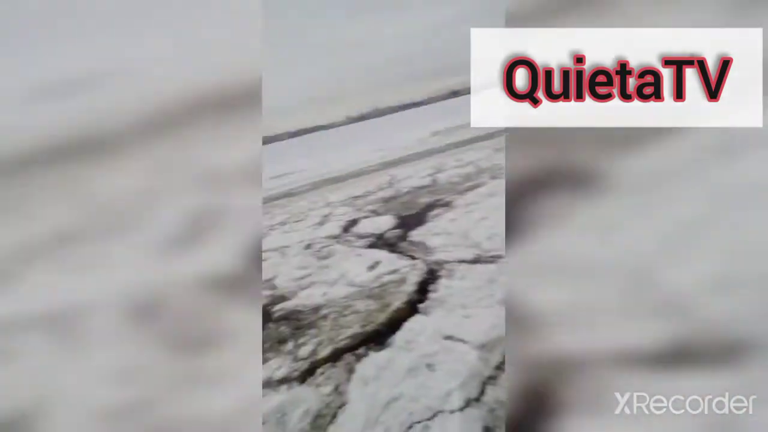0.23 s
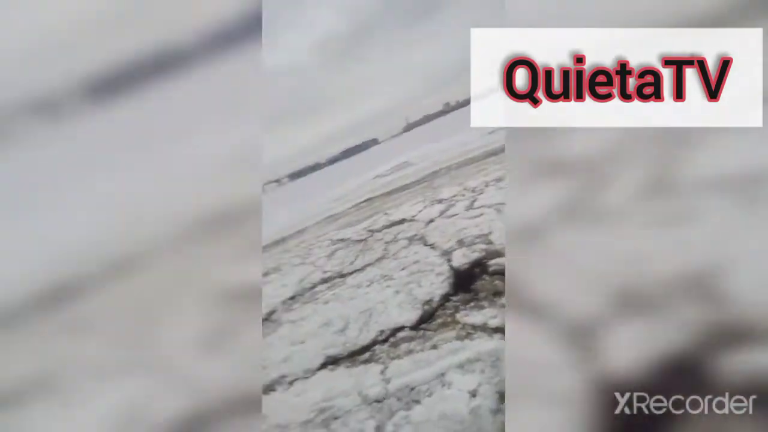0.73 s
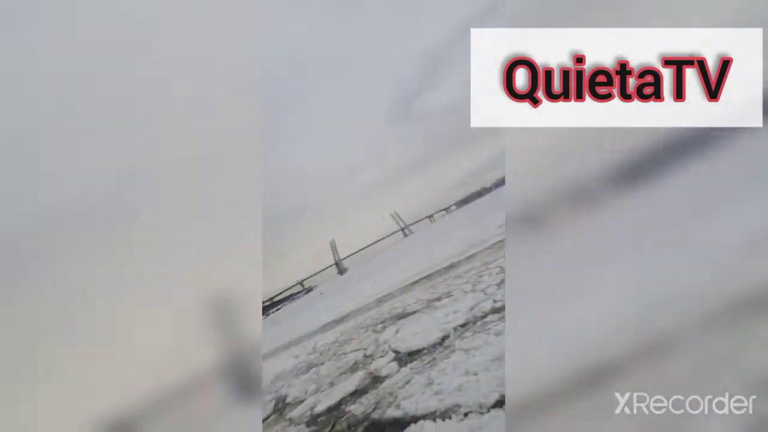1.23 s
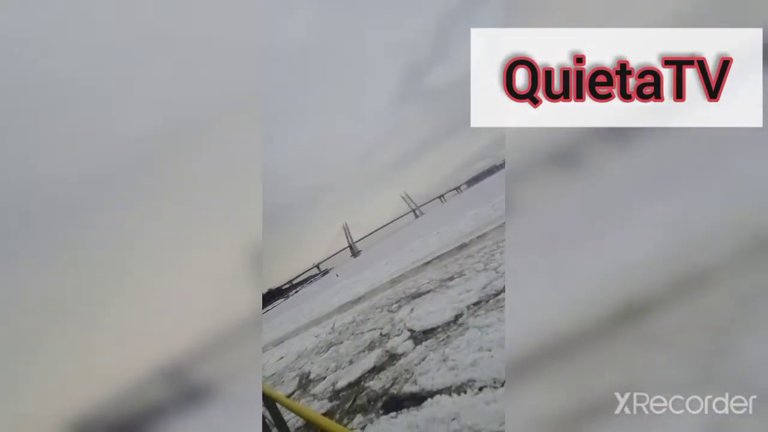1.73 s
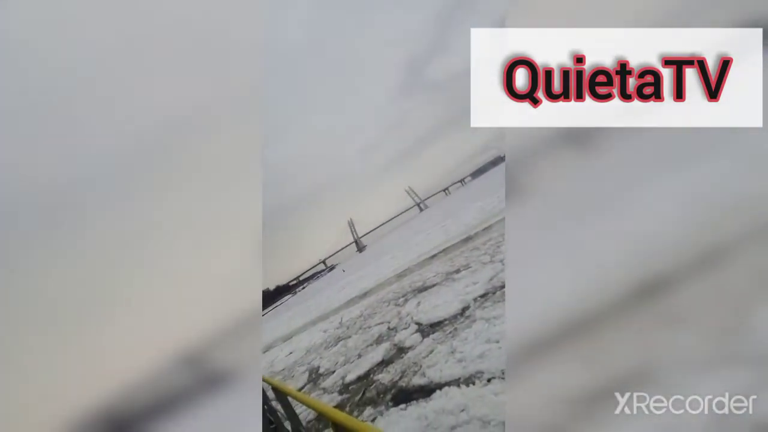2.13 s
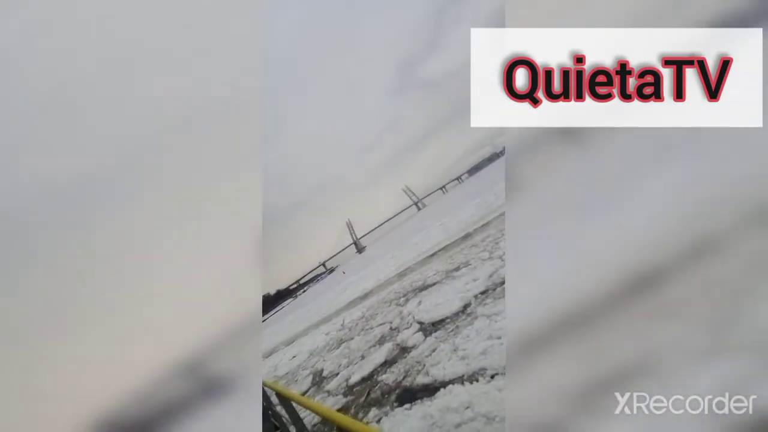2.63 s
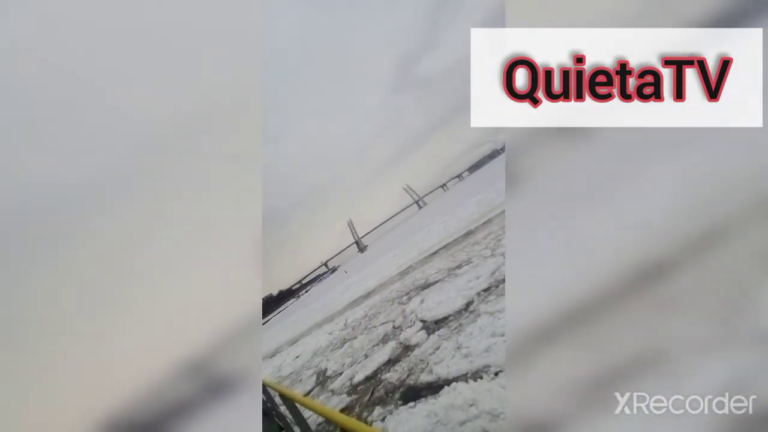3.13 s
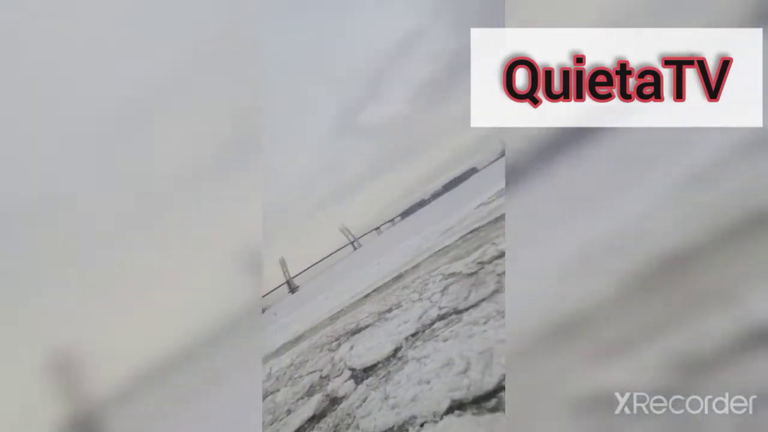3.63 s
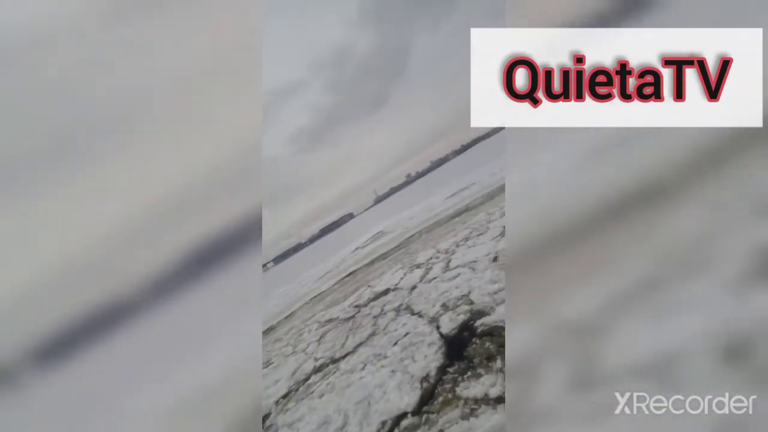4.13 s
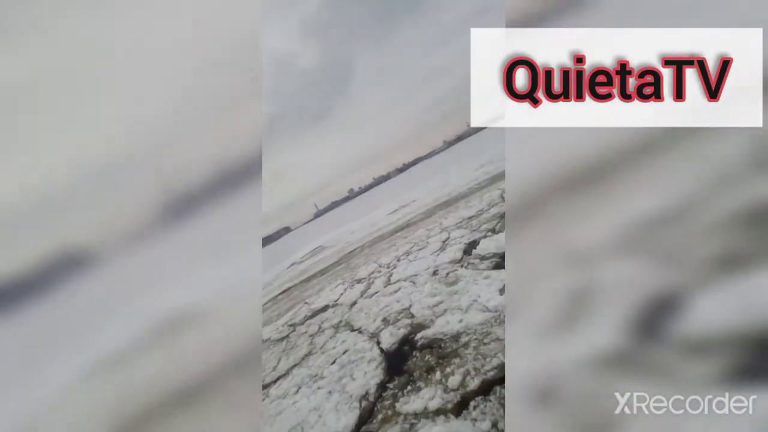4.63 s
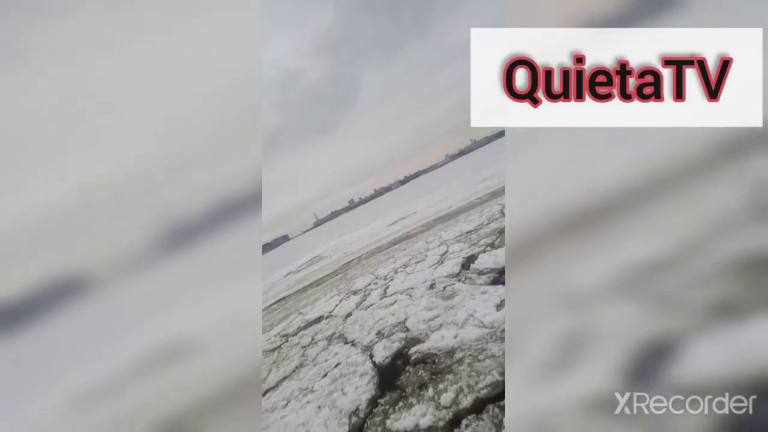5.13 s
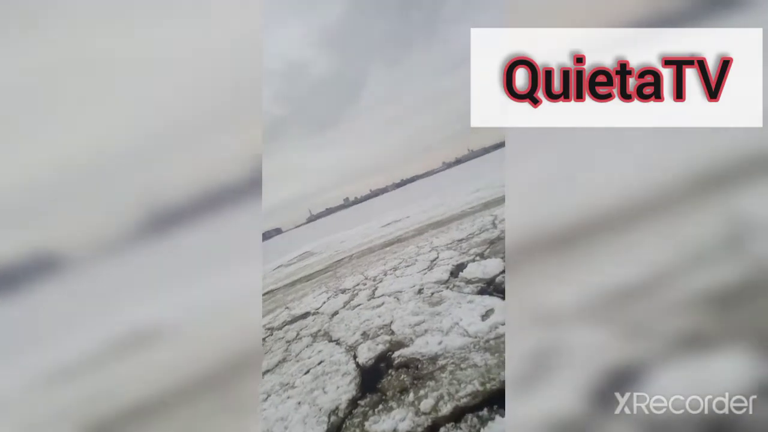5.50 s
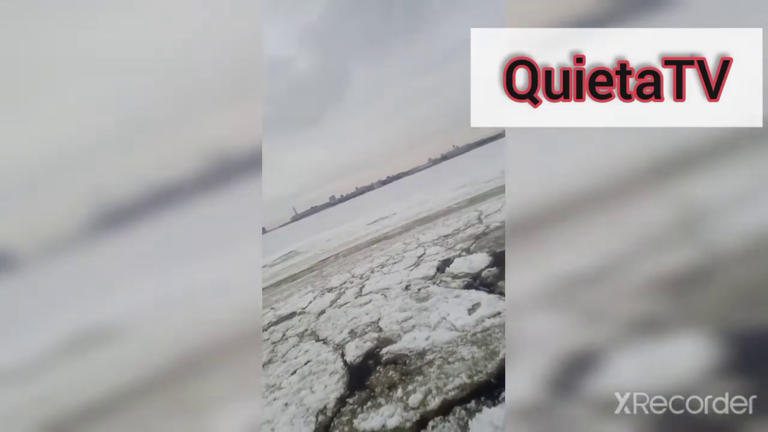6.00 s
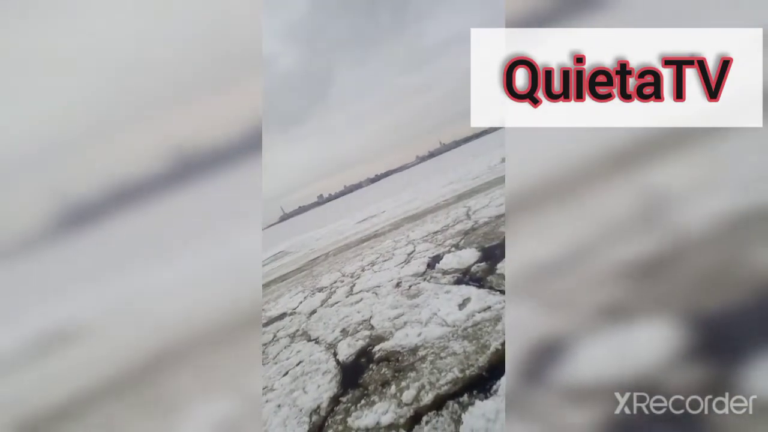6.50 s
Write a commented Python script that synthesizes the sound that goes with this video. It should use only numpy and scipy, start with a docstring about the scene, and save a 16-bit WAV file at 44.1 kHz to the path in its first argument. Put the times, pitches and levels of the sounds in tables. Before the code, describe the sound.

Deep, steady ship engine throb with rattling metal plating and fan roar, plus faint swishes of icy slush.

```python
"""A deep, rolling engine beat swells up: a ship in broken ice, heard from the open deck.
Its big twelve-cylinder diesel fires unevenly, booming in the exhaust and rattling the metal plating
the same way on every cycle, six cycles a second, over a roar of gas and fans.
Slush swishes past the hull, and a small loose metal fitting jingles faintly.
About halfway through, the listener turns and the balance of the tones shifts."""
import sys
import numpy as np
from scipy import signal
from scipy.fft import rfft, irfft
from scipy.io import wavfile
from scipy.ndimage import uniform_filter1d

SR = 44100
rng = np.random.default_rng(int(sys.argv[2]) if len(sys.argv) > 2 else 0)


def digitize_waveform(pressure):
    """Quantize a signal to 16-bit integers and store it at the path in sys.argv[1].

    Rows of a 2-D input are taken as channels; values are limited to [-1, 1].
    """
    field = np.atleast_2d(pressure).T
    bounded = np.clip(field, -1, 1)
    quanta = np.round(bounded * 32767).astype(np.int16)
    wavfile.write(sys.argv[1], SR, quanta)


N = 298116
TIME = np.arange(N) / SR
CYCLE_HZ, CYCLE_SAMPLES = 5.993, 7360  # in one engine cycle, every cylinder fires once
TURN_START_S, TURN_TAKES_S = 3.02, .89  # the listener turns away from the deck panel and the fitting

# Ringing air ducts. Each row: pitch in Hz, width in Hz, level in dB before the turn, and after it.
DUCTS = [(323.7, 23, -35.5, -36), (391.7, 5.4, -41, -40.5), (1051, 10.4, -46.5, -46.5),
         (1933, 7.5, -59.5, -60.5), (3590, 18, -69, -72.5), (3655, 18, -70.5, -74),
         (4320, 130, -72.5, -73.5), (8470, 170, -69, -77)]
# The generator's hum. Each row: pitch in Hz, level in dB.
GENERATOR_HUM = [(39.5, -55), (59.3, -43), (79, -47)]
# The fan's whine comes and goes. Each row: time in seconds, level in dB.
FAN_LEVEL = [(0, -41), (.6, -37), (1, -40), (1.2, -36), (1.52, -34.5), (2.05, -49), (2.3, -36), (2.65, -50),
             (3.05, -48), (3.6, -36.5), (4.1, -47), (5.2, -40), (5.55, -35), (5.8, -40), (6.2, -38.5),
             (6.5, -44), (6.76, -37)]
# Swishes of slush. Each row: time of the peak in seconds, level there in dB, rise in seconds,
# fade in seconds, tilt toward the treble in dB per octave, lowest and highest frequency in Hz.
SWISHES = [(.33, -62, .03, 0.15, 4, 3000, 15000), (1.39, -48.5, .038, .11, 5, 4000, 16000),
           (2.83, -57, .045, .09, 0, 4000, 14000), (5.32, -51, 0.049, 0.14, -1, 2800, 16000),
           (6.54, -50.5, 0.05, .11, -3, 5000, 16000)]
# The tones the loose fitting rings with. Each row: pitch in Hz, width in Hz, relative level in dB.
FITTING_TONES = [(7060, 210, -6.5), (7410, 220, -5.5), (7750, 280, -9), (8500, 420, -5.5),
                 (9360, 220, -15.5), (14400, 500, -22)]
# The two stops it touches. Each row: place in its swing from 0 to 1, relative level in dB.
STOPS = [(.11, 0), (.78, -2)]
# How hard it chatters against them. Each row: time in seconds, strength in dB.
CHATTER = [(0, -70), (3.4, -67.5), (4.3, -63), (5.9, -61.5), (6.76, -68)]
# Its clear clinks. Each row: start in seconds, relative level in dB, pitch that rings most in Hz.
CLINKS = [(.053, -54, 7250), (.197, -53, 7150), (.222, -57, 7700), (.339, -46, 7200), (.412, -44, 7250),
          (.696, -49, 7060), (.980, -55, 9350), (1.840, -50, 9300), (2.053, -41, 7000), (2.414, -48, 9400),
          (2.485, -58, 9400), (2.768, -48, 9500), (2.917, -51, 7350), (3.271, -56, 7550),
          (3.795, -48, 7450), (3.866, -54, 7350), (4.222, -50, 7450), (4.294, -53, 7750),
          (4.480, -58, 9400), (4.694, -54, 7550), (4.793, -49, 7350), (4.865, -47, 7550),
          (4.984, -51, 8650), (5.047, -53, 8400), (5.224, -48, 7330), (5.412, -51, 7200),
          (5.487, -49, 7150), (5.549, -48, 8350), (5.702, -42, 7100), (5.767, -54, 9200),
          (5.795, -51, 7700), (5.866, -46, 7450), (5.917, -41, 7100), (5.988, -40, 7150),
          (6.007, -49, 7300), (6.049, -54, 8500), (6.203, -46, 7070), (6.226, -46, 7400),
          (6.297, -61, 7600), (6.346, -44, 7100)]
# The tone colour of the gas and fan roar. Each row: frequency in Hz, relative level in dB.
ROAR_COLOUR = [(12, -40), (25, -23), (40, -18), (70, -3.5), (150, -3), (260, -3.5), (420, -8.5),
               (700, -7.5), (1030, -11.5), (1200, -13.5), (1800, -23), (2600, -31.5), (3600, -37.5),
               (5000, -44), (15000, -59.5)]
# How much of the roar's upper part is heard. Each row: time in seconds, gain in dB.
ROAR_BRIGHTNESS = [(0, -2.5), (1.5, -0.2), (3.3, -0.6), (4.2, -3.5), (6.76, -3.5)]
# The strength of each cylinder in dB, in firing order.
CYLINDER_DB = [-.6, -9.9, -4.8, -9.4, -5, -4.7, -6.2, -3.4, -8.8, -1.3, -1.3, -7.6]
# How late each cylinder's puff leaves the exhaust pipes, in seconds (negative means early).
CYLINDER_LAG_S = [.0007, .0004, -.0034, .0014, .0036, .0026, .0001, .0016, -.004, .0001, .0026, .0029]
# The rattle of the plating. Each row: frequency in Hz, typical level of each tone near it in dB.
RATTLE_COLOUR = [(140, -58), (165, -41.5), (220, -41), (330, -45.5), (420, -44), (600, -47.5), (1000, -51),
                 (1300, -63), (2000, -73), (4000, -104.5)]
# Blows on a deck panel. Each row: place in the cycle from 0 to 1, pitch in Hz, relative level in dB.
THUMPS = [(.98, 228, 0), (.09, 282, 1), (.34, 238, -2), (.44, 320, -5)]
# The hull's higher tones. An "order" is a tone at a whole multiple of the cycle rate.
# Each row: order, level in dB before the turn, and after it.
HULL_TONES = [(30, -33.5, -32.5), (35, -37, -35.5), (40, -37, -32), (43, -35, -35), (48, -36, -35),
              (52, -30.5, -36), (56, -35, -37.5), (59, -41, -35), (65, -36, -43), (66, -44, -37),
              (72, -37, -42), (73, -35, -31.5), (84, -37, -36.5), (96, -50, -41), (109, -50, -40),
              (121, -42, -50), (141, -50, -41), (157, -44, -52), (176, -46, -47)]
# The low boom of the exhaust. Each row: order, level in dB.
BOOM_TONES = [(6, -39), (7, -38.5), (8, -40), (9, -43), (10, -40), (11, -39.5), (12, -20.2), (13, -25.8),
              (14, -42), (15, -31), (16, -35), (17, -30), (18, -23.4), (19, -34), (20, -40), (21, -34),
              (22, -34.5), (23, -27), (24, -36), (25, -33.5)]


def undb(db):
    """Turn decibels into a number to multiply by."""
    return 10 ** (np.asarray(db) / 20)


def level(x, db):
    """Set a sound's average (rms) level."""
    return x * undb(db) / np.sqrt(np.mean(x ** 2))


def curve(rows):
    """Join rows of time and value with straight lines."""
    return np.interp(TIME, *np.transpose(rows))


def ramp(start_s, length_s):
    """Rise evenly from 0 to 1 and stay there."""
    return np.clip((TIME - start_s) / length_s, 0, 1)


def turning(before_db, after_db):
    """A gain that slides from one level to another as the listener turns."""
    return undb(before_db + (after_db - before_db) * ramp(TURN_START_S, TURN_TAKES_S))


def colour(x, points):
    """Shape the bass and treble along a curve of (Hz, dB) points."""
    hz, db = np.transpose(points)
    f = np.maximum(np.fft.rfftfreq(len(x), 1 / SR), 1)
    gain = undb(np.interp(np.log(f), np.log(hz), db))
    return irfft(rfft(x) * gain, len(x))


def resonance(x, hz, width):
    """Make a sound ring near one pitch, using two band-pass filters in a row."""
    f = np.maximum(np.fft.rfftfreq(N, 1 / SR), 1)
    return irfft(rfft(x, N) / (1 + 1j * (f * f - hz * hz) / (f * width * np.pi / 2)) ** 2, N)


def drift(rate_hz):
    """Wander smoothly at random, mostly between -1 and 1."""
    count = int(N / SR * 40)
    steps = np.interp(TIME * rate_hz, np.arange(count), rng.standard_normal(count))
    return uniform_filter1d(steps, int(SR / rate_hz / 2))


def repeat(cycle, crank):
    """Play one engine cycle over and over; crank counts the cycles gone by."""
    return np.interp(crank % 1 * CYCLE_SAMPLES, np.arange(CYCLE_SAMPLES + 1), np.append(cycle, cycle[0]))


def add(out, start_s, sound):
    """Mix a short sound in at the given time."""
    start = int(np.clip(start_s * SR, 0, N - 1))
    out[start:start + len(sound)] += sound[:N - start]


def vents_and_generator(fan_hz=642.5, waver_hz=1.86):
    """Moving air rings in the ducts while the generator hums and a fan whines."""
    air = rng.standard_normal(N)
    ducts = sum(level(resonance(air, hz, width), 0) * turning(before, after)
                for hz, width, before, after in DUCTS)
    hum = sum(level(np.sin(2 * np.pi * (hz * TIME + rng.random())), db) for hz, db in GENERATOR_HUM)
    whine_hz = fan_hz + waver_hz * drift(8)
    whine = level(np.sin(2 * np.pi * np.cumsum(whine_hz) / SR), 0)
    return ducts + hum + whine * undb(curve(FAN_LEVEL))


def slush(grain_db=.5, grain_samples=64):
    """Wet ice crumbs slide off a floe: a quick, grainy swell of hiss."""
    hiss_colour = [(1500, -12), (4000, -2), (6000, -.5), (8000, 1.5), (11000, -4.5), (15500, -11)]
    noise = rng.standard_normal(N)
    roughness = np.repeat(rng.standard_normal(N // grain_samples + 1), grain_samples)[:N]
    grains = noise * undb(grain_db * roughness)
    out = 0
    for peak_s, db, rise, fade, tilt, low_hz, high_hz in SWISHES:
        age = TIME - peak_s
        swell = np.exp(-(np.minimum(age, 0) / rise) ** 2 - np.maximum(age, 0) / fade)
        band = signal.butter(5, [low_hz, high_hz], "band", fs=SR, output="sos")
        tilted = [(hz, hiss_db + tilt * np.log2(hz)) for hz, hiss_db in hiss_colour]
        hiss = colour(signal.sosfilt(band, grains), tilted)
        out = out + swell * level(hiss, db)
    return out


def chatter(contact, swings_per_cycle=7 / 3, scatter_db=4.5):
    """The swinging fitting touches two stops on each swing, never equally hard."""
    swing_hz = swings_per_cycle * CYCLE_HZ
    swings = int(swing_hz * N / SR)
    ticks = np.zeros(N)
    for swing, chances in enumerate(rng.uniform(-2, 1, (swings, len(STOPS)))):
        for (place, db), chance in zip(STOPS, chances):
            add(ticks, (swing + place) / swing_hz, undb(db + scatter_db * chance) * contact)
    return undb(curve(CHATTER)) * ticks


def loose_fitting(fade_in, buzz_db=-65, away_db=-1.5, clink_db=-7.5, reach_hz=260):
    """Shaking makes a small metal part buzz, chatter and clink. Each contact is a brief scrape."""
    t = np.arange(SR // 12) / SR
    contact = (1 - np.exp(-t / .0015)) * np.exp(-t / .007)  # builds in 1.5 ms, fades in 7 ms
    contact = contact / contact.max()
    shake = fade_in * turning(buzz_db, buzz_db + away_db) + chatter(contact)
    out = 0
    for hz, width, db in FITTING_TONES:
        force = undb(db) * shake
        for start_s, hit_db, ring_hz in CLINKS:
            # where it is struck decides which tones answer
            answer = 1 / (1 + ((hz - ring_hz) / reach_hz) ** 2)
            add(force, start_s, undb(hit_db + clink_db) * answer * contact)
        scrape = rng.standard_normal(N)
        out = out + resonance(scrape * force, hz, width) / resonance(scrape, hz, width).std()
    return out


def gas_roar(crank, force, db=-27, throb=.8, flicker_db=.5):
    """Swirling gas swells with each firing; the deckhouse shades the upper part of its roar."""
    pulsing = rng.standard_normal(N) * repeat(force, crank) ** throb
    gas = level(colour(pulsing, ROAR_COLOUR), db)
    upper = signal.sosfiltfilt(signal.butter(2, 900, "high", fs=SR, output="sos"), gas)
    return gas - upper + upper * undb(curve(ROAR_BRIGHTNESS) + flicker_db * drift(15))


def firings(first_place=.047):
    """Where each puff falls in the cycle, from 0 to 1; unequal pipe lengths make the beat roll."""
    even = np.arange(len(CYLINDER_DB)) / len(CYLINDER_DB)
    return first_place + even + np.array(CYLINDER_LAG_S) * CYCLE_HZ


def shaking(fade_cycles=.03, spread_cycles=.03, steady=1.5, rise_samples=150):
    """One cycle of force on the plating: each firing arrives by its own path, swells and dies away."""
    place = np.arange(CYCLE_SAMPLES) / CYCLE_SAMPLES
    arrivals = firings() + rng.uniform(-spread_cycles, spread_cycles, len(CYLINDER_DB))
    kicks = sum(undb(db) * np.exp(-((place - at) % 1) / fade_cycles)
                for at, db in zip(arrivals, CYLINDER_DB))
    return level(steady + uniform_filter1d(kicks, rise_samples, mode="wrap"), 0)


def plating_rattle(crank, force, scatter_db=1.5, unsteady_db=.5):
    """Plates and valve gear rattle alike on every cycle, filling the gaps between the engine's tones."""
    orders = rfft(rng.standard_normal(CYCLE_SAMPLES) * force)
    # keep the timing of the kicks, but make all the tones about equally strong
    orders = orders / np.abs(orders) * undb(scatter_db * rng.standard_normal(len(orders)))
    orders[[0] + [row[0] for row in BOOM_TONES + HULL_TONES]] = 0  # leave room for exhaust and hull
    cycle = colour(irfft(orders, CYCLE_SAMPLES) * CYCLE_SAMPLES / 2, RATTLE_COLOUR)
    return repeat(cycle, crank) * undb(unsteady_db * drift(10))


def deck_panel(crank, db=-30, away_db=-6, rise_s=.005, fade_s=.012):
    """A few firings of each cycle thump a deck panel, which answers with a low chug."""
    t = np.arange(CYCLE_SAMPLES) / SR
    cycle = np.zeros(CYCLE_SAMPLES)
    for place, hz, blow_db in THUMPS:
        ring = np.sin(2 * np.pi * hz * t) * (1 - np.exp(-t / rise_s)) * np.exp(-t / fade_s)
        cycle += undb(blow_db) * np.roll(ring, int(place * CYCLE_SAMPLES))
    return level(repeat(cycle, crank), db) * turning(0, away_db)


def engine_tone(crank, order):
    """One order of the engine; the pattern of the puffs decides where in the cycle it peaks."""
    drive = np.sum(undb(CYLINDER_DB) * np.exp(-2j * np.pi * order * firings()))
    return np.cos(2 * np.pi * order * crank + np.angle(-drive))


def exhaust_and_hull(crank, away_db=-.16):
    """The firings drive the pipe, which booms all round, and the hull, whose tones vary by direction."""
    pipe = sum(undb(db) * engine_tone(crank, order) for order, db in BOOM_TONES)
    hull = sum(turning(before, after) * engine_tone(crank, order) for order, before, after in HULL_TONES)
    return pipe * turning(0, away_db) + hull


def scene(start_db=-9, fade_in_s=.41):
    """Engine and fans from one place on deck, with slush alongside and the fitting close by."""
    crank = CYCLE_HZ * TIME
    force = shaking()
    fade_in = undb(start_db * (1 - ramp(0, fade_in_s)))
    engine = exhaust_and_hull(crank) + deck_panel(crank) + plating_rattle(crank, force)
    ship = engine + gas_roar(crank, force) + vents_and_generator()
    return (ship * fade_in + slush() + loose_fitting(fade_in))[None]


def record(dry, top_hz=15700):
    """Cut away the very highest treble."""
    return signal.sosfilt(signal.ellip(10, .2, 80, top_hz, fs=SR, output="sos"), dry)


dry = scene()
out = record(dry)
digitize_waveform(out)
```